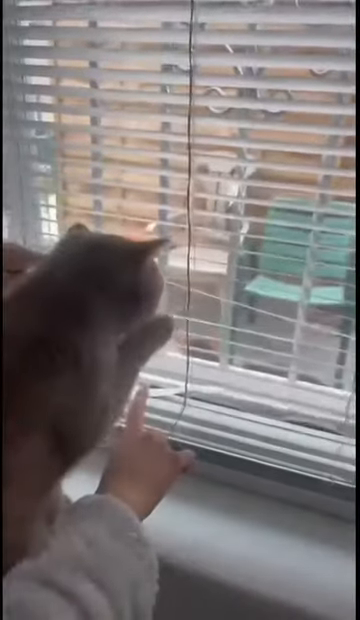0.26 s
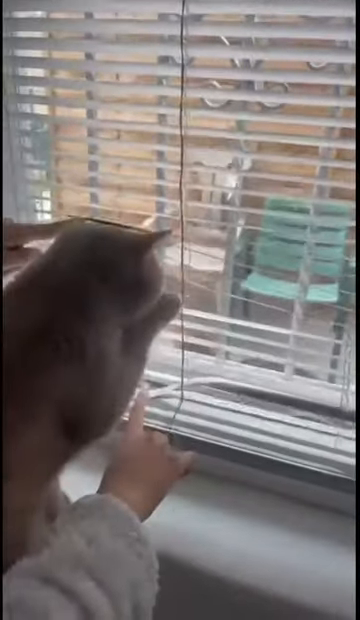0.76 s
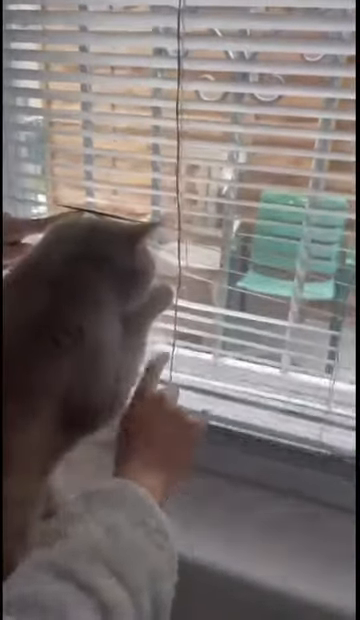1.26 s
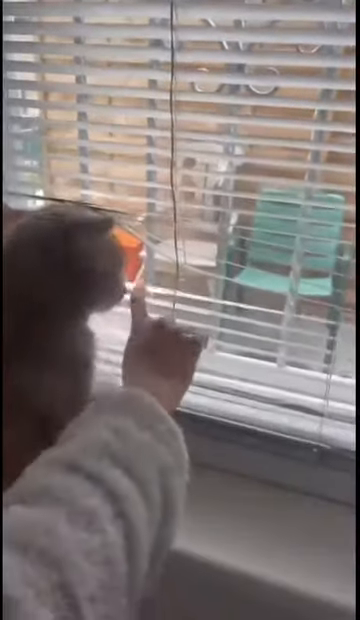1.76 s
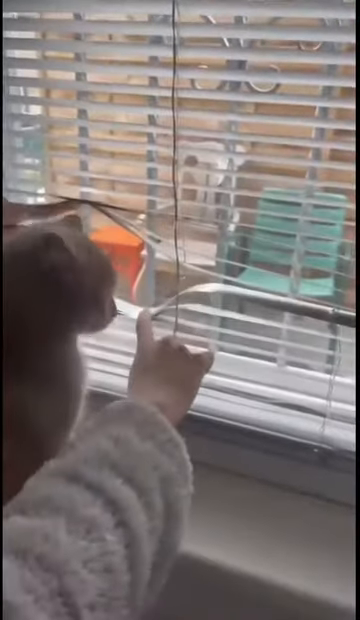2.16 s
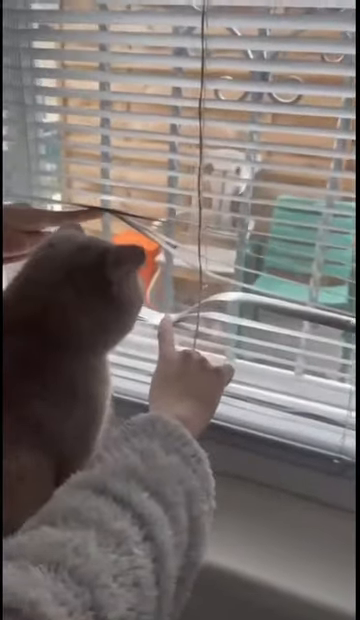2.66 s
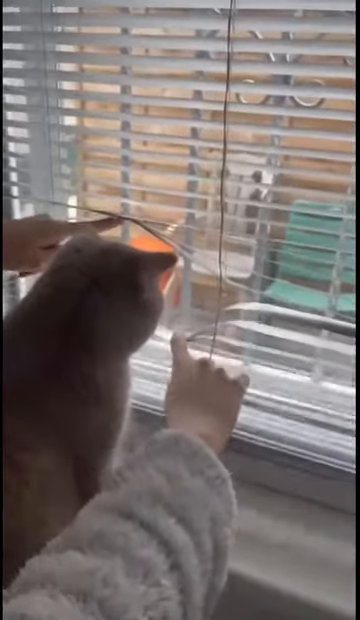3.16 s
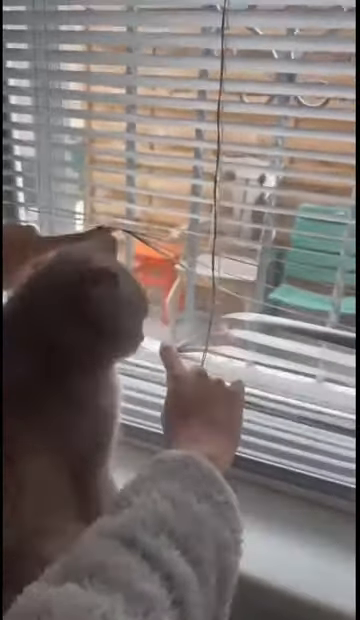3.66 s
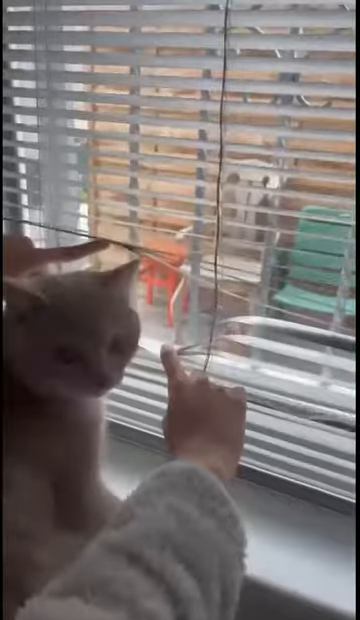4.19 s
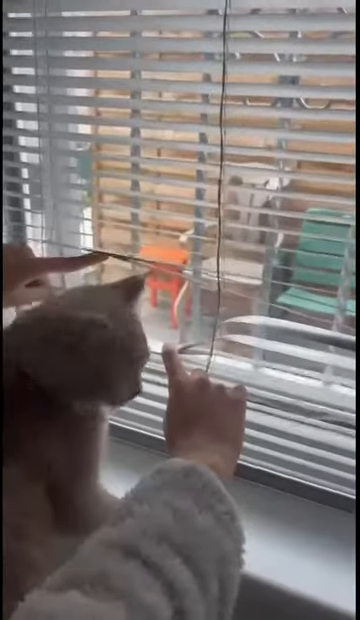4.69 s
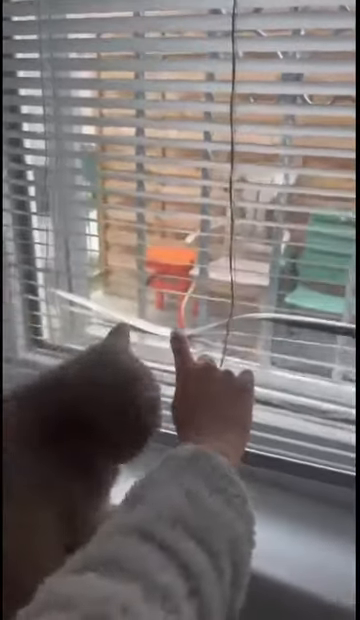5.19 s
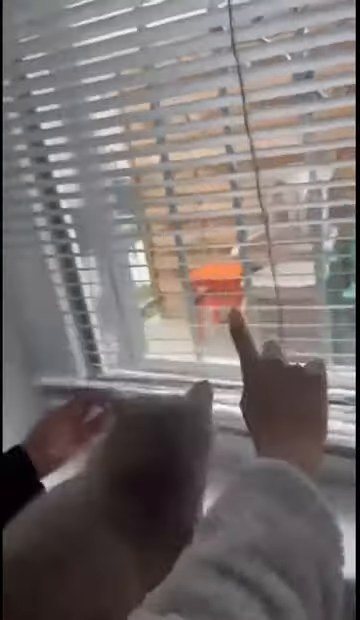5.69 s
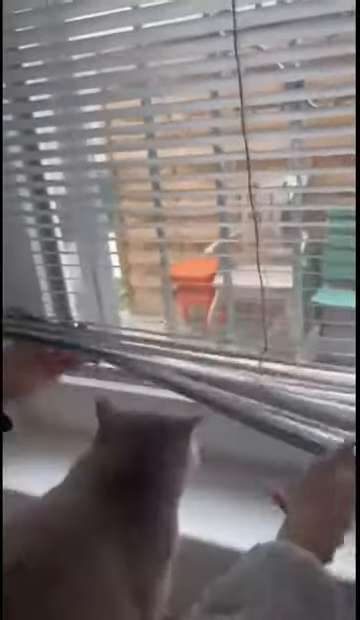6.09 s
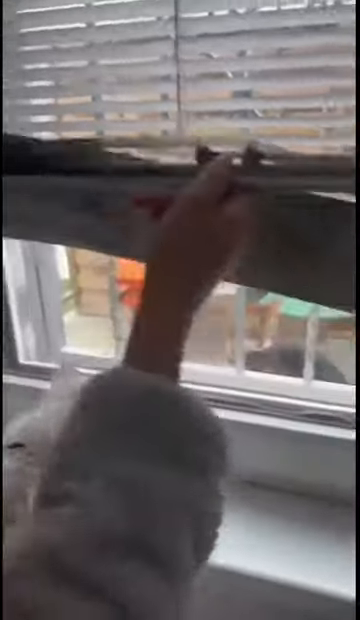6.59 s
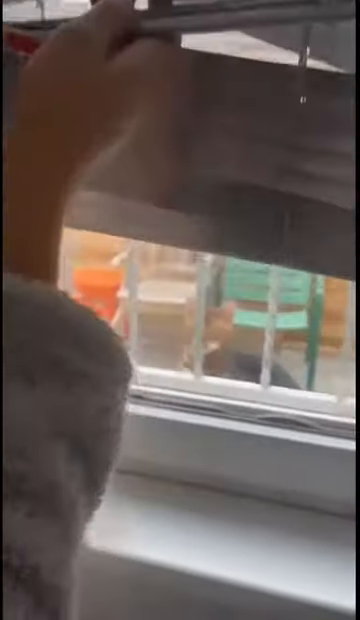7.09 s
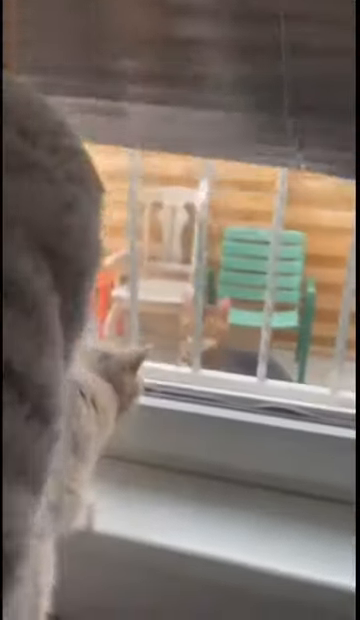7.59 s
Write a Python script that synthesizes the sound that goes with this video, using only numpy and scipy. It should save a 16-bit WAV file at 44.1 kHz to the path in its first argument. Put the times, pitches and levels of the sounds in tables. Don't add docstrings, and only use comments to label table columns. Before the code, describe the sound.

Close, bright rattling of metal blind slats in sparse bursts indoors, with hard handling thumps on the microphone before a sharp clash and lifting rustle.

```python
import sys
import numpy as np
from scipy import signal
from scipy.fft import rfft, irfft, next_fast_len
from scipy.io import wavfile
from scipy.ndimage import uniform_filter1d, minimum_filter1d

SR = 44100
rng = np.random.default_rng(int(sys.argv[2]) if len(sys.argv) > 2 else 0)


def decibels_to_gain(level_db):
    exponent = np.asarray(level_db, float) / 20
    return 10 ** exponent


def unload_audio(sound):
    columns = np.transpose(np.atleast_2d(sound))
    steps = np.round(np.clip(columns, -1, 1) * 32767)
    wavfile.write(sys.argv[1], SR, steps.astype(np.int16))


N = 346185

# time in seconds, level in dB, slat ring in dB re level.
RUSTLE = [(0.0, -57, 4.5), (0.9, -90, 13), (1.07, -54.5, -25), (1.29, -86.5, 34.5), (1.5, -101, 17),
          (1.81, -66, -23), (2.21, -91.5, -2.5), (2.931, -100, 17), (3.101, -81, 17), (4.5, -94.5, -7),
          (4.94, -76.5, -23), (5.27, -100, -12), (5.661, -62.5, -2.5), (6.1, -63, -3.5), (6.358, -44.5, 0),
          (6.86, -73, 8), (7.4, -54, 2.5), (7.85, -64, 9.5)]
TICKS = [(0.185, -41, 0.21, -49), (0.223, -43, 0.17, 2.5), (0.8702, -53.5, 0.39, -4),
         (1.0066, -44.5, 0.3, 2), (1.3728, -44, 0.26, -2), (1.665, -45.5, 0.088, -4.5),
         (2.9744, -47.5, 0.48, -11), (2.9994, -45, 0.13, -30.5), (3.054, -43, 0.056, -16),
         (3.714, -46.5, 0.18, -1.5), (3.849, -39, 0.094, -24), (4.0297, -55, 0.27, -7),
         (4.114, -52, 0.27, 0), (4.41, -51, 0.17, -10), (4.9742, -52, 0.57, 1), (5.006, -44.5, 0.24, -22),
         (5.41, -56.5, 1, -7), (5.4645, -46, 0.23, -3.5), (5.5096, -35, 0.063, -32), (6.189, -30, 0.23, 0),
         (5.538, -41, 0.11, -34), (5.5505, -30, 0.078, -33), (6.4977, -62, .12, -10),
         (6.9716, -61, .15, -8), (7.0105, -46.5, 0.078, 3), (7.1741, -47, 0.16, -6),
         (7.2045, -46.5, 0.3, 14), (7.6136, -42.5, 0.16, -5), (7.34, -53, 0.11, 10), (7.52, -60, 0.12, -7),
         (5.8712, -46, 0.076, -20), (5.8827, -47.5, 0.061, -20), (5.903, -37, .08, -25),
         (6.168, -34, 0.045, -26), (6.197, -37, 0.067, -15), (6.0304, -45.5, 0.18, 1.5),
         (0.9557, -63, 0.15, 6)]
CLASHES = [(0.081, -36, 0.088, 9), (0.1198, -40.5, 0.36, 6.5), (0.399, -46, 0.43, 6.5),
           (0.6, -45.5, 0.26, 7.5), (1.6013, -56.5, 0.54, -27), (1.7991, -41, 0.31, 5),
           (1.8586, -34, 0.14, 6.5), (2.109, -54.5, 0.19, 11.5), (2.955, -45.5, 0.15, 12),
           (4.787, -44, 0.059, 10), (5.6083, -42, 0.39, 7), (6.1524, -46, 1, -30),
           (6.2805, -20.5, 0.035, 12), (6.757, -47.5, 0.9, -14)]
CLACKS = [(0.0583, -37, 0.29, 3), (2.1873, -56.5, 0.14, -23), (3.7923, -51.5, 0.12, 5.5),
          (3.8705, -46.5, 0.18, -12), (4.057, -40.5, 0.25, 3.5), (4.553, -57.5, 0.22, 0),
          (5.0804, -44.5, 0.12, -1.5), (5.5377, -38.5, 0.34, -57), (5.767, -34, 0.056, -39),
          (6.093, -37, 0.053, -42), (6.799, -43, 0.44, 7), (7.0395, -32.5, 0.11, -34)]
SLAPS = [
    (1.0783, -32.5, 0.23, -23.5),
    (5.22, -56, 0.27, 0),
    (6.6116, -40, 0.32, -31),
    (7.1107, -36, 0.16, -9),
    (5.4, -47, 0.051, -15),
    (4.2, -50, 0.027, -20),
    (3.226, -62, .08, -25),
]
PUSHES = [(1.06, -36, 0.41, 6), (1.2405, -38, 0.3, 1), (1.764, -51.5, 0.24, 0), (1.9194, -55.5, 0.64, -37),
          (3.313, -46, 0.12, -22), (4.383, -35, 0.14, 5.5), (5.1063, -54.5, 0.38, -10),
          (6.6423, -42.5, 0.2, 4), (7.7565, -31.5, 0.087, 3.5), (0.0428, -48, 0.082, 0),
          (0.4105, -45.5, 0.072, 21), (6.0643, -44.5, 0.19, -2), (0.376, -75, 0.086, 0),
          (3.226, -51.5, 0.057, -5), (1.8008, -44, 0.09, 4), (1.8577, -52, 0.11, 6), (2.11, -52, .1, -2),
          (4.29, -63, 0.11, -9.5)]
# peak time in seconds, peak in dB, rise in seconds, fall in seconds.
SWELLS = [(0.47, -59, 0.072, 0.033), (1.699, -70.5, 0.074, 0.01), (2.93, -76, 0.027, 0.039),
          (3.261, -56.5, 0.029, 0.033), (3.559, -76, 0.093, 0.072), (4.22, -71.5, 0.069, 0.054),
          (4.599, -76.5, 0.068, 0.006), (4.754, -61, 0.062, 0.078), (5.887, -59.5, 0.056, 0.03),
          (6.503, -49.5, 0.11, 0.037), (7.227, -45, 0.027, 0.05), (7.46, -52.5, 0.034, 0.011),
          (7.621, -55, 0.083, 0.018), (7.735, -53.5, 0.033, 0.011)]
TICK_DB, CLASH_DB, CLACK_DB, SLAP_DB = (10.5, -8), (12, -2), (5, -6), (4.5, -9.5)
PUSH_DB, DRAG_DB, RUSTLE_DB = (-14, -4), (10.5, -7.5), (6.5, -5)
# frequency in Hz, gain in dB.
DULL = [(150, -6.5), (400, 1.5), (900, -1), (1600, -18.5), (2400, -2), (3300, -3), (4300, -3.5), (5200, 0),
        (6500, -24)]
MIDDLE = [(3500, -42.5), (4600, -3.5), (5400, -5.5), (6300, -3.5), (7000, -6.5), (7700, -7.5), (9000, -47)]
BRIGHT = [(6000, -35.5), (7100, -14.5), (8000, -1), (8800, -1), (10100, 4.5), (10600, -5.5), (11300, -22.5),
          (14000, -49)]
# frequency in Hz, width in Hz, level in dB.
RING = [(1121, 26, 1), (1010, 60, -17), (1185, 30, -13), (1270, 80, -17)]
# frequency in Hz, width in Hz, level in dB.
TONES = [(3145, 37, -21), (6270, 90, -15.5)]
# start in seconds, peak in dB, centre in Hz.
SNAPS = [(0.08, -20, 8870), (0.873, -52, 7400), (1.058, -17.5, 3100), (1.239, -36.5, 2110),
         (1.598, -42.5, 4370), (1.855, -42, 6000), (2.189, -58, 7170), (3.717, -34, 6200),
         (3.848, -29, 6200), (4.381, -30, 3300), (5.536, -15, 2510), (5.768, -30.5, 5000),
         (6.095, -31, 7100), (6.186, -17.5, 6470), (6.279, -9.5, 8750), (6.8, -23.5, 5160),
         (7.046, -36, 2920), (0.0585, -36.5, 3070), (5.6068, -33, 3900), (6.241, -37, 5500),
         (6.345, -34.5, 3000), (6.428, -31, 2450), (6.471, -36.5, 2500)]
# start in seconds, peak in dB, frequency in Hz, t60 in seconds.
PINGS = [(1.241, -43, 1421, .22), (1.239, -44, 2051, .28), (1.241, -44, 4511, .1), (1.241, -49, 2654, .25),
         (1.241, -47, 3268, .3), (3.31, -54, 5100, .06), (1.06, -48, 3500, .15), (1.08, -48, 2400, .12),
         (3.25, -49, 1600, .14), (3.245, -49, 1850, .14), (5.13, -59, 1600, .12), (6.43, -45, 2440, .1),
         (6.51, -45, 3800, .06), (6.28, -33, 7445, .04), (4.385, -54, 3128, .14), (6.281, -24.5, 1122, .3),
         (6.283, -34, 1190, .15), (4.39, -44, 1152, .17), (3.25, -52, 2150, .1), (1.241, -54, 2848, .2),
         (1.241, -52, 3666, .2), (1.241, -48, 700, .08), (1.375, -52, 2700, .12), (1.07, -44, 5943, .19),
         (1.075, -46, 10140, .17), (1.075, -50, 10720, .2), (6.281, -34, 7741, .064),
         (6.281, -36, 10200, .15), (6.281, -38, 2627, .09), (6.281, -42, 3165, .2), (6.19, -40, 10100, .15),
         (7.045, -44, 2880, .07), (7.74, -50, 2620, .1), (5.609, -46, 3900, .07), (5.61, -52, 1130, .15),
         (6.465, -47, 2500, .08), (7.755, -46, 1121, .3), (3.226, -54, 2000, .06), (3.245, -49, 3500, .1),
         (3.255, -53, 5290, .1), (3.258, -50, 6210, .08), (1.262, -52, 1150, .4), (5.645, -52, 1130, .3),
         (6.066, -48, 1590, .05), (0.412, -50, 1150, .15), (1.801, -46, 2470, .08), (1.858, -43, 2470, .08),
         (2.111, -56, 1750, .06), (1.86, -48, 750, .08), (1.805, -50, 10900, .12)]
# start in seconds, peak in dB, frequency in Hz.
BUMPS = [
    (2.252, -49, 887),
    (5.5278, -35.5, 1590),
    (5.5415, -35, 1100),
    (5.5628, -16.5, 1330),
    (5.573, -40, 1480),
    (5.583, -20.5, 1170),
    (5.598, -38, 900),
    (1.945, -43, 510),
]
# peak time in seconds, peak in dB.
RUB = [
    (5.55, -44.5),
    (5.735, -56.5),
    (6.0, -61),
]
RUB_RISE_DB_PER_S, RUB_FALL_DB_PER_S = 402, 103.5
# peak time in seconds, peak in dB.
SQUEEZE = [
    (5.58, -51.5),
    (5.76, -52.5),
    (6.0, -62),
]
SQUEEZE_HZ, SQUEEZE_DB_PER_S = 820, 120
# centre in seconds, peak in dB, frequency in Hz, length in seconds.
TAPS = [
    (5.549, -37, 6500, 0.00075),
    (5.563, -32, 3330, 0.00068),
    (5.586, -32, 2600, 0.00066),
    (5.596, -35.5, 2480, 0.00054),
    (5.54, -43, 6800, .0008),
    (5.574, -50, 6000, .001),
]
# peak time in seconds, peak in dB.
PANE = [(0.11, -64), (0.65, -66.5), (1.33, -70), (1.77, -61), (3.02, -71), (5.05, -66.5), (5.55, -65.5),
        (5.77, -66), (7.19, -67.5), (7.45, -64.5), (7.74, -65.5)]
PANE_HZ, PANE_REST_DB = 61, -75.5
PANE_RISE_DB_PER_S, PANE_FALL_DB_PER_S = 40.5, 29.5
# frequency in Hz, density in dB per Hz.
AIR = [(15, -50), (25, -10), (63, -2), (192, -4), (358, -7.5), (475, -15), (700, -11), (839, -21),
       (2300, -37.5), (3210, -33), (3850, -35.5), (6620, -43), (7940, -59), (12000, -39), (15600, -71.5),
       (22000, -120)]
AIR_DB = -68.5
# frequency in Hz, t60 in seconds.
ROOM = [(200, 1), (1000, 0.49), (4000, 0.099), (10000, 0.15)]
# frequency in Hz, left lead in radians.
TURN = [(0, 0), (780, 1.4), (1000, .3), (2200, .1), (3000, 1.5), (4200, 1.0), (4700, 2.9), (5000, 3.4),
        (5450, 6.12), (6850, 6.45), (7650, 8.9), (8400, 9.3), (9800, 9.5), (10100, 10.4), (10450, 9.9),
        (10800, 9.9), (11500, 12.4)]
# frequency in Hz, likeness 0 to 1.
LIKE = [(60, 0.83), (750, 0.11), (1100, 0.35), (1800, 0.84), (2600, 0.048), (4000, 0.32), (4900, 0.79),
        (5600, 0.88), (6700, 0.6), (7300, 0.17), (8300, 0.79), (9800, 1), (10700, 0.57)]
# frequency in Hz, left lead in radians.
TURN_NEAR = [(0, 0), (780, 1), (1000, .3), (2200, .3), (3000, .9), (4200, 1), (4700, 2), (5100, 4.5),
             (5500, 6), (6400, 6.5), (7200, 7.9), (8200, 9), (9600, 9.5), (10000, 10.4), (10400, 10.3),
             (11500, 11.5)]
# frequency in Hz, likeness 0 to 1.
LIKE_NEAR = [(60, 0.93), (750, 0.49), (1100, 0.56), (1800, .88), (2600, 0.34), (4000, 0.37), (4900, 0.71),
             (5700, 0.79), (6700, 0.99), (8300, 0.82), (9500, .92), (10700, 0.77)]
GATHER_S, GATHER_LENGTH_S, SWAY = 5.6, .3, .2
# frequency in Hz, depth in dB.
SUM_UNDER = [(4400, 6), (4740, 4.2), (5080, 5.5), (7100, 6), (7500, 3.5), (7840, 3), (8200, 1), (9700, 1),
             (10000, 3.2), (10400, 2), (10700, 4)]
# frequency in Hz, depth in dB.
DIFFERENCE_UNDER = [(5000, 6), (5430, 4), (5770, 2.5), (6460, 2.5), (6800, 5), (7200, 6)]
TOP_UNDER_DB = (15, 8)
# start in seconds, length in seconds.
KEPT_FULL = [(.075, .02), (.165, .04), (.597, .02), (.868, .014), (1.052, .014), (1.368, .025),
             (1.593, .015), (2.095, .065), (2.952, .03), (3.05, .03), (3.235, .04), (3.712, .03),
             (3.845, .035), (4.027, .05), (4.378, .015), (5.39, .02), (5.525, .035), (6.275, .015),
             (6.795, .012)]
# start in seconds, length in seconds.
KEPT_CAPPED = [(.045, .04), (.092, .02), (.39, .045), (.975, .05), (1.236, .03), (2.184, .012),
               (3.205, .04), (3.266, .06), (3.62, .02), (3.78, .03), (4.285, .035), (4.535, .03),
               (4.76, .05), (5.497, .035), (5.6, .035), (5.755, .055), (6.065, .045), (6.14, .045),
               (6.595, .03), (6.735, .03), (6.81, .03), (7.015, .035), (7.08, .065), (7.175, .07),
               (7.74, .04)]


def evened(x):
    return x / np.sqrt(np.mean(x ** 2) + 1e-20)


def read(points, hz):
    f, value = np.transpose(points)
    return np.interp(np.log(hz + 50), np.log(f + 50), value)


def colour(x, points):
    log_gain = np.log(decibels_to_gain(read(points, abs(np.fft.fftfreq(4096, 1 / SR)))))
    impulse = np.fft.ifft(np.exp(np.conj(signal.hilbert(log_gain)))).real[:2048]
    return signal.oaconvolve(x, impulse[None] / np.linalg.norm(impulse), axes=1)[:, :N]


def modes(x, table):
    out = 0
    for hz, width_hz, db in table:
        r = np.exp(-np.pi * width_hz / SR)
        pole = r * np.exp(2j * np.pi * hz / SR)
        gain = decibels_to_gain(db) * np.sqrt(2 * (1 - r * r))
        out = out + gain * signal.lfilter([1], [1, -pole], x).real
    return out


def add(mix, s, sound):
    part = mix[..., round(s * SR):][..., :sound.shape[-1]]
    part += sound[..., :part.shape[-1]]


def jolts(rows, rise_db_per_s, fall_db_per_s):
    t = np.arange(N) / SR
    levels = []
    for s, db in rows:
        levels.append(db - np.where(t < s, rise_db_per_s * (s - t), fall_db_per_s * (t - s)))
    return np.max(levels, 0)


def slats():
    middle, bright, dull, ring = np.sqrt(shaking())
    hits = collisions()
    wide = colour(hits * middle, MIDDLE) + colour(hits * bright, BRIGHT) + colour(hits * dull, DULL)
    wide = wide + decibels_to_gain(-1.5) * chime(wide) + snaps()
    ringing = modes(np.roll(hits, 999, axis=1) * ring, RING)
    high_pass = signal.butter(2, 750, "high", fs=SR, output="sos")
    return wide + modes(hits * middle, TONES) + decibels_to_gain(-5.5) * signal.sosfilt(high_pass, ringing)


def shaking():
    rise_s = 0.002
    s, level_db, ring_db = np.transpose(RUSTLE)
    t = np.arange(N) / SR
    power = decibels_to_gain([np.interp(t, s, level_db + share_db) for share_db in (0, *RUSTLE_DB, ring_db)]) ** 2
    u = np.arange(SR // 2) / SR
    contacts = ((TICKS, TICK_DB), (CLASHES, CLASH_DB), (CLACKS, CLACK_DB), (SLAPS, SLAP_DB), (PUSHES, PUSH_DB))
    for knocks, colour_db in contacts:
        for s, peak_db, t60_s, ring_db in knocks:
            shower = decibels_to_gain(peak_db - 9.5 - 60 * u / max(t60_s, .02)) * (1 - np.exp(-u / rise_s))
            shares = decibels_to_gain([0, *colour_db, ring_db])[:, None]
            add(power, max(s - .001, 0), (shares * shower) ** 2)
    for s, peak_db, swell_s, fall_s in SWELLS:
        lead_s = np.clip(swell_s, .005, .08)
        hump = np.exp(-((u - 3 * lead_s) / np.where(u < 3 * lead_s, lead_s, fall_s)) ** 2)
        shares = decibels_to_gain(peak_db + np.array([0, *DRAG_DB, -12]))[:, None]
        add(power, s - 3 * lead_s, (shares * hump) ** 2)
    return power


def collisions():
    per_s = 7000
    clump = decibels_to_gain(1.75 * evened(uniform_filter1d(rng.standard_normal(N), 180)))
    struck = rng.random(N) < per_s / SR
    return evened(struck * clump * rng.choice([-1., 1.], (2, N)))


def chime(x):
    parts, tones, swing_db = 15, 14, 8
    u, out, step = np.arange(3000) / SR, 0, np.arange(tones)[:, None]
    for centre_hz, draw in zip(np.geomspace(1500, 6000, parts), rng.random((parts, tones, 2))):
        hz = centre_hz * 1.6 ** ((step + draw[:, :1]) / tones - .5)
        t60_s = (.03 + .055 * draw[:, 1:]) * (2000 / centre_hz) ** .6
        partials = (-1) ** step / np.sqrt(t60_s) * decibels_to_gain(-60 * u / t60_s) * np.sin(2 * np.pi * hz * u)
        body = partials.sum(0)
        turn = np.repeat(np.clip(rng.standard_normal(N // 1500 + 1), -2, 1.5), 1500)[:N]
        share = decibels_to_gain(swing_db * uniform_filter1d(turn, 700))
        out = out + signal.oaconvolve(x * share, body[None] / np.linalg.norm(body), axes=1)[:, :N]
    return out / np.sqrt(parts)


def snaps():
    out, u = np.zeros((2, N)), np.arange(900) / SR
    for s, peak_db, hz in SNAPS:
        burst = rng.standard_normal((2, 900)) * (1 - np.exp(-u / 0.0021)) * np.exp(-u / 0.0044)
        crack = modes(np.diff(burst, prepend=0), [(hz, 1200, 0), (9500, 1800, -6)])
        add(out, s - .001, decibels_to_gain(peak_db - 3.0) * crack)
    return out


def pings():
    out, u = np.zeros(N), np.arange(SR // 3) / SR
    for s, peak_db, hz, t60_s in PINGS:
        envelope = decibels_to_gain(peak_db - 60 * u / max(t60_s, .01)) * (1 - np.exp(-u / .003))
        add(out, s, envelope * np.sin(2 * np.pi * hz * u))
    return out * np.array([[1], [0]])


def bumps():
    out, u = np.zeros(N), np.arange(700) / SR
    for s, peak_db, hz in BUMPS:
        turns = hz * np.cumsum(0.4 + 2.8 * np.exp(-u / 0.0014)) / SR
        envelope = 2 * (1 - np.exp(-u / 0.0015)) ** 2 * np.exp(-u / 0.0015)
        add(out, s, decibels_to_gain(peak_db + 3.5) * np.sin(2 * np.pi * turns) * envelope)
    rub = evened(modes(modes(rng.standard_normal(N), [(770, 2500, 0)]), [(826, 4100, 0)]))
    out += decibels_to_gain(jolts(RUB, RUB_RISE_DB_PER_S, RUB_FALL_DB_PER_S)) * rub
    narrow = [(SQUEEZE_HZ, 350, 0)]
    squeeze = evened(modes(modes(rub[::-1], narrow), narrow))
    out += decibels_to_gain(jolts(SQUEEZE, SQUEEZE_DB_PER_S, SQUEEZE_DB_PER_S)) * squeeze
    return out * np.array([[1], [-.95]])


def taps():
    out, u = np.zeros(N), np.arange(-200, 200) / SR
    for s, peak_db, hz, length_s in TAPS:
        add(out, s + u[0], decibels_to_gain(peak_db) * np.exp(-(u / length_s) ** 2) * np.cos(2 * np.pi * hz * u))
    return out


def thud():
    out, u = np.zeros((2, N)), np.arange(SR // 3) / SR
    low = modes(rng.standard_normal(len(u)), [(177, 105, 21.5), (650, 170, 3.3)])
    add(out, 1.242, decibels_to_gain(-72.0 - 60 * u / 0.6) * low)
    return out


def pane():
    level_db = np.maximum(jolts(PANE, PANE_RISE_DB_PER_S, PANE_FALL_DB_PER_S), PANE_REST_DB)
    t = np.arange(N) / SR
    hum = evened(modes(modes(rng.standard_normal((2, N)), [(PANE_HZ, 14, 0)]), [(PANE_HZ, 30, 0)]))
    hum = decibels_to_gain(level_db) * (hum[0] + 0.37 * hum[1] * np.array([[1], [-1]]))
    boom_db = np.interp(t, [1.25, 1.3, 1.42, 1.6, 1.7], [-101.0, -49.5, -47.0, -68, -103])
    return hum + decibels_to_gain(boom_db) * np.sin(2 * np.pi * PANE_HZ * t)


def room(x):
    echoes = np.zeros((2, SR // 2))
    at = np.arange(200, SR // 2 - 20, 20) + rng.integers(0, 20, (2, (SR // 2 - 201) // 20))
    np.put_along_axis(echoes, at, rng.choice([-1., 1.], at.shape), 1)
    hz, t, z = signal.stft(echoes, SR, nperseg=256)
    tail = signal.istft(z * decibels_to_gain(-60 * t / read(ROOM, hz)[:, None]), SR, nperseg=256)[1]
    return signal.fftconvolve(x, tail / np.linalg.norm(tail[0]), axes=1)[:, :N]


def air():
    noise = rng.standard_normal((2, N))
    hz, t, z = signal.stft(noise, SR, nperseg=1024)
    patches = evened(uniform_filter1d(uniform_filter1d(rng.standard_normal(z.shape[1:]), 10, 0), 6, 1))
    gain = decibels_to_gain(read(AIR, hz)[:, None] + 2.3 * patches)
    tone = evened(signal.istft(z * gain, SR, nperseg=1024)[1][:, :N])
    return decibels_to_gain(AIR_DB) * (tone + modes(noise, [(248.0, 19, -6.0), (348.3, 4.9, -9.0)]))


def ports(x):
    size = next_fast_len(N + 4096)
    hz, (a, b) = np.fft.rfftfreq(size, 1 / SR), rfft(x, size)
    heard = []
    for likes, turn in ((LIKE, TURN), (LIKE_NEAR, TURN_NEAR)):
        like = np.clip(read(likes, hz), 0, 1)
        turned = a * np.exp(-1j * np.interp(hz, *np.transpose(turn)))
        heard.append(irfft(like * turned + np.sqrt(1 - like ** 2) * b, size)[:N])
    sway = SWAY * evened(uniform_filter1d(uniform_filter1d(rng.standard_normal(N), 4000), 4000))
    near = np.clip((np.arange(N) / SR - GATHER_S) / GATHER_LENGTH_S, .15, .9)
    near = np.clip(near + sway, 0, 1)
    return np.array([x[0], decibels_to_gain(0.64) * ((1 - near) * heard[0] + near * heard[1])])


def scene():
    blind = slats() + pings()
    return ports(blind + decibels_to_gain(-16.5) * room(blind) + air()) + pane() + thud() + bumps() + taps()


def thinned(x):
    top_hz, faint_db, band_bins, lead = 10300, -92, 16, 733
    window = np.sin(np.pi * (np.arange(2048) + .5) / 2048)
    pair = np.pad([x[0] + x[1], x[0] - x[1]], ((0, 0), (lead, 0))) / 2
    hz, t, z = signal.stft(pair, SR, window, 2048, 1024)
    edges = np.r_[0, 12:440:band_bins, 448:1024:8]
    band_hz = hz[edges]
    level = 10 * np.log10(np.add.reduceat(abs(z) ** 2, edges, 1) + 1e-20)
    level += 1.6 * rng.standard_normal(level.shape)
    rules = (SUM_UNDER, DIFFERENCE_UNDER)
    under_db = np.array([np.interp(band_hz, *np.transpose(rule)) for rule in rules])
    keep = (level > level[::-1] - under_db[..., None]) | (band_hz < 300)[:, None]
    lately = -minimum_filter1d(-level[0], size=15, axis=1, origin=7)
    spared = (level[0] > faint_db) | (lately < level[0] + 12) | (rng.random(lately.shape) < .45)
    keep[0] &= spared | ((band_hz < 2300) | (band_hz > 5200))[:, None]
    below = level[:, (band_hz > 8500) & (band_hz < top_hz)].max(0).mean(0)
    keep &= (band_hz < top_hz)[:, None] | (level > below - np.reshape(TOP_UNDER_DB, (2, 1, 1)))
    z *= keep[:, np.searchsorted(edges, np.arange(1025), "right") - 1]
    mid, side = signal.istft(z, SR, window, 2048, 1024)[1][:, lead:lead + N]
    out = np.array([mid + side, mid - side])
    lost = x - out
    band_pass = signal.firwin(127, [3000, top_hz - 200], pass_zero=False, fs=SR)
    capped = .75 * signal.oaconvolve(lost, band_pass[None], "same")
    for spans, part in ((KEPT_CAPPED, capped), (KEPT_FULL, lost)):
        gate = np.zeros(N)
        for s, length_s in spans:
            add(gate, s, np.ones(round(.75 * length_s * SR)))
        out = out + uniform_filter1d(gate, size=200) * part
    return out


def roll_off(x):
    return signal.sosfilt(signal.butter(12, 12510, fs=SR, output="sos"), x)


def record(dry):
    low_pass = signal.firwin(255, 11400, fs=SR)
    mix = thinned(signal.oaconvolve(dry, low_pass[None], "same"))
    return roll_off(mix)


dry = scene()
out = record(dry)
unload_audio(out)
```